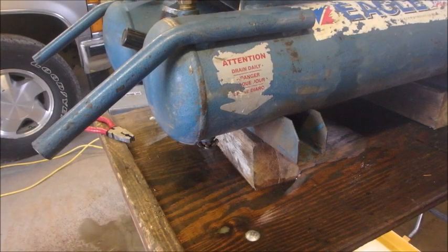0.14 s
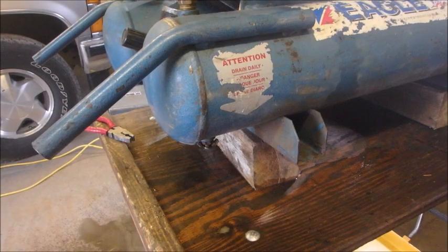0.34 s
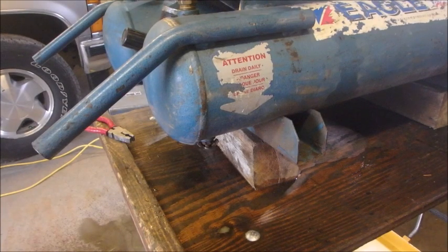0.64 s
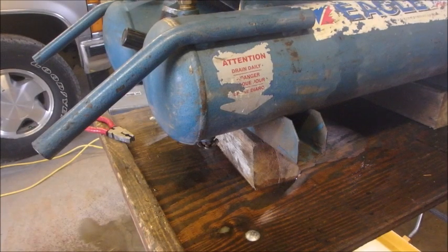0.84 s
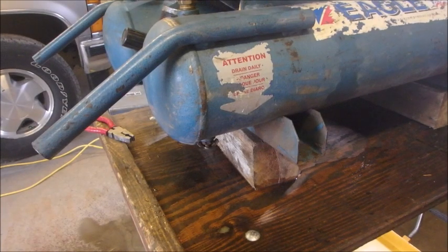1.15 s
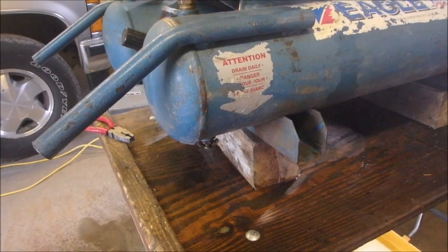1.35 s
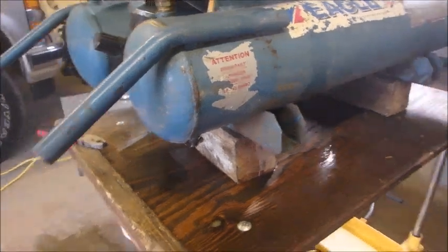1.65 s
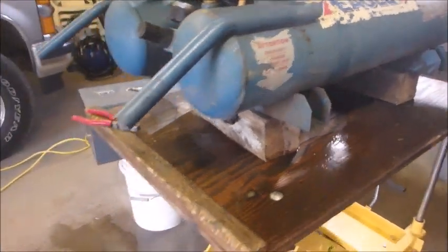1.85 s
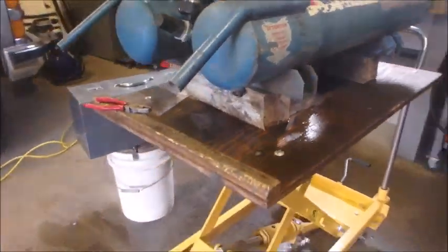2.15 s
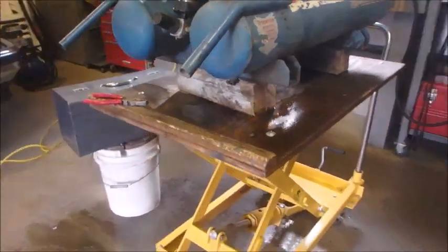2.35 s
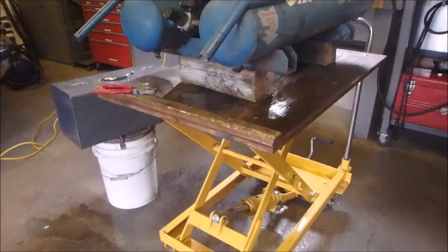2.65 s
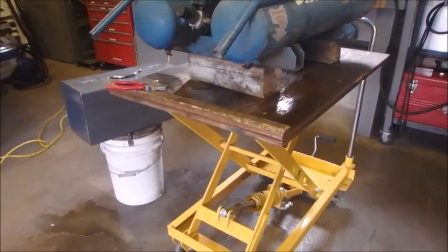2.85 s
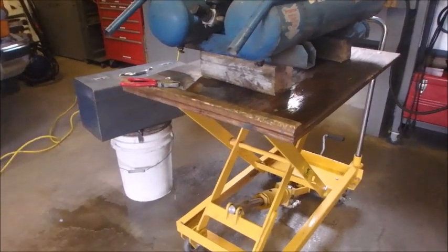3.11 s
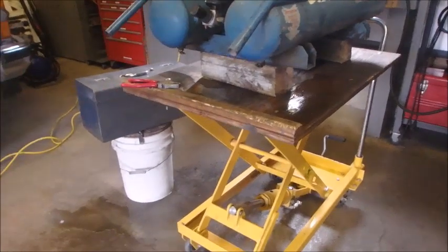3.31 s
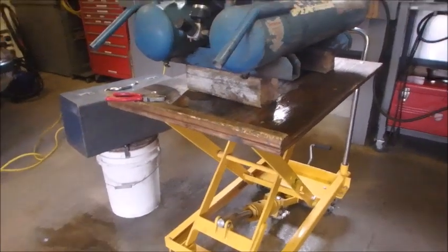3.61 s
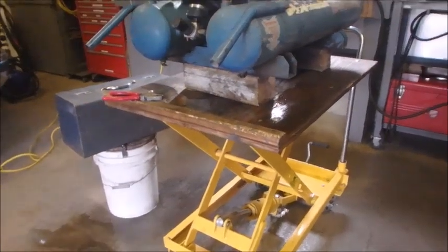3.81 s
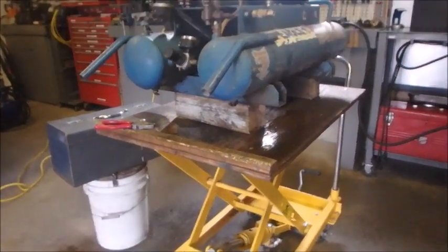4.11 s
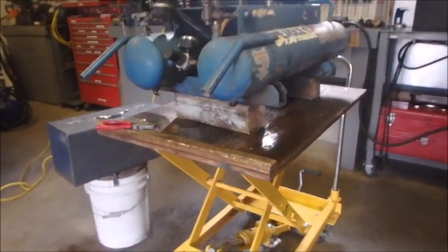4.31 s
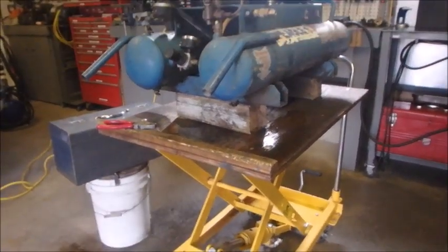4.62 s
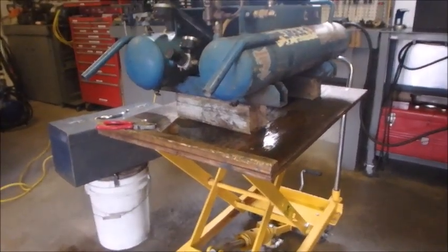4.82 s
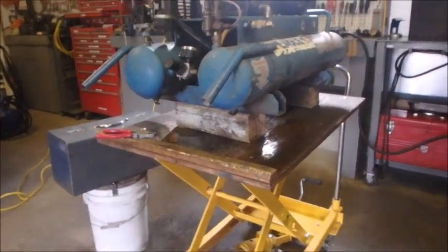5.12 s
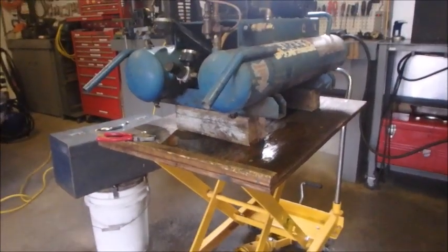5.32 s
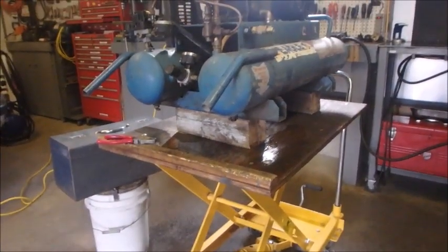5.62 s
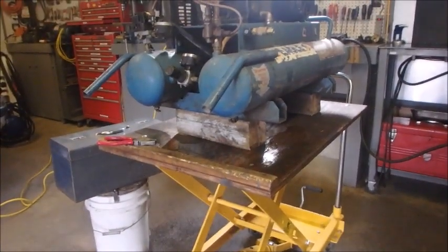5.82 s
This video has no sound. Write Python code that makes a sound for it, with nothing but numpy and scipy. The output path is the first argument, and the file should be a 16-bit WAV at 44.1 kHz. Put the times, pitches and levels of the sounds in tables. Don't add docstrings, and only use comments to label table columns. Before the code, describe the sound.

In a workshop, a dense, bright, slightly fluttering jet of air blows throughout in stereo. The microphone rests near the valve, then retreats across the floor, making muffled bumps and skin-rub rumble on its casing. A hard crack with a low wobble comes late and momentarily pushes the hiss down, followed by two firmer taps and small thumps.

```python
import sys
import numpy as np
from scipy import signal
from scipy.fft import rfft, irfft
from scipy.io import wavfile
from scipy.ndimage import uniform_filter1d

SR = 44100
rng = np.random.default_rng(int(sys.argv[2]) if len(sys.argv) > 2 else 0)


def to_linear_factor(level_db):
    exponent = np.asarray(level_db, float) / 20
    return 10 ** exponent


def dump_mix(stems):
    frames = np.atleast_2d(stems).T
    limited = np.clip(frames, -1, 1)
    pcm = np.round(limited * 32767).astype(np.int16)
    wavfile.write(sys.argv[1], SR, pcm)


N = 262832


def along(rows, at, warp=np.asarray):
    x, *columns = np.transpose(rows)
    return [np.interp(warp(at), warp(x), column) for column in columns]


def drift(rate, count=1):
    hop = 40
    r = np.exp(-2 * np.pi * hop * rate / SR)
    noise = rng.standard_normal((count, N // hop + 2002))
    slow = signal.lfilter([1], [1, -2 * r, r * r], noise)[:, 2000:]
    return np.array([np.interp(np.arange(N) / hop, np.arange(len(s)), s / s.std()) for s in slow])


def bumps(peaks, hz):
    return sum(db / (1 + (2 * (hz - centre) / width) ** 2) for centre, width, db in peaks)


def ring(click, hz, t60):
    r, w = to_linear_factor(-60 / (t60 * SR)), 2 * np.pi * hz / SR
    return signal.lfilter([0, np.sin(w)], [1, -2 * r * np.cos(w), r * r], click + 1e-18)


# time in seconds, jet level in dB, share of the way covered [0-1].
WALK = [
    (0, -23.5, 0.03),
    (1.45, -24, 0.05),
    (1.7, -22.5, 0.13),
    (1.82, -25, 0.18),
    (2.05, -25, 0.41),
    (2.5, -26, 0.82),
    (3, -24.5, 0.96),
    (3.9, -23.5, 0.91),
    (5, -24, 0.93),
    (5.96, -23, 0.95),
]


def jet():
    flutter_db = .35 * drift(12)[0] + .45 * drift(40)[0]
    sputter = to_linear_factor(flutter_db - uniform_filter1d(flutter_db, size=SR // 5))
    noise = rng.standard_normal((3, N)) * sputter
    hz, s, (common, *own) = signal.stft(noise, SR, nperseg=2048)
    level_db, way = along(WALK, s)
    way = np.clip(way, 0, 1)
    far = np.sin(np.pi / 2 * np.minimum(way / 0.95, 1)) ** 2
    gain = jet_colour(hz, s, way, far, level_db)
    f = hz[:, None]
    balance_db, lead, alike = ports(f)
    alike = 1 - (1 - alike) * np.where(f < 3000, 1 - .98 * far ** 4, .75)
    out = []
    for sign, own_noise in zip((1, -1), own):
        port = to_linear_factor(sign * balance_db / 2) * np.exp(-.5j * sign * lead)
        mixed = np.sqrt(alike) * common + np.sqrt(1 - alike) * own_noise
        out.append(gain * port * mixed)
    return signal.istft(np.array(out), SR, nperseg=2048)[1][:, :N]


# pitch in Hz, strength in dB per Hz.
NEAR = [(75, -37), (150, -29), (400, -22), (850, -12.5), (1550, -14), (2050, -10.5), (2350, -1),
        (3350, -6.5), (3900, -4.5), (6200, -7), (8800, -7), (11300, -8.5), (12700, -15), (14700, -23)]
FAR = [(30, -23), (150, -34), (400, -20.5), (850, -18), (1300, -13), (2050, -12), (2350, -4), (3300, -3),
       (3900, -6), (5800, -10), (6300, -9), (10500, -6.5), (13000, -20), (15100, -31.5)]
# pitch in Hz, width in Hz, boost in dB.
NEAR_CAVITIES = [(890, 450, 3.5), (2620, 270, -2.5), (3390, 410, 8), (4420, 690, 4.5), (5830, 520, 6.5),
                 (7200, 390, 4), (9400, 110, 0), (9940, 430, 1), (11060, 510, 5)]
FAR_CAVITIES = [(860, 220, 9.5), (2880, 150, -1), (3323, 145, 5), (3720, 31, 2.5), (4130, 58, 8.5),
                (5860, 230, 7), (7770, 700, -6), (8700, 290, 3.5), (8760, 100, 0.5), (12050, 780, 4),
                (14300, 1700, 11)]
# pitch in Hz, width in Hz, boost in dB.
SWING = [(915, 320, 0.5), (3490, 230, -4), (4130, 490, -5.5), (5600, 790, 3.5), (6600, 930, -2)]
# pitch in Hz, width in Hz, boost in dB.
STILL = [(8900, 120, 6), (10400, 780, 3), (13700, 600, 2), (14800, 100, 10)]


def jet_colour(hz, s, way, far, level_db):
    f, frames = hz[:, None], np.minimum((s * SR).astype(int), N - 1)
    near_gain = to_linear_factor(along(NEAR, hz + 1, np.log)[0] + bumps(NEAR_CAVITIES, hz))
    far_gain = to_linear_factor(along(FAR, hz + 1, np.log)[0] + bumps(FAR_CAVITIES, hz))
    gain = near_gain[:, None] ** (1 - far) * far_gain[:, None] ** far

    fade, midway = 1 - way ** 7.6, np.sin(np.pi * np.sqrt(way))
    hump = 9140 + (11460 - 9140) * way, 1100, 4.5 * fade + 2 * midway
    dip = 6300 + (10200 - 6300) * way, 1500, -4.5 * fade - 3.5 * midway
    passing = 4.0 * far * (1 - far)
    gain = gain * to_linear_factor(bumps([hump, dip], f) + passing * bumps(SWING, f))

    still_from_s, still_by_s = 4.1, 5.13
    still = np.clip((s - still_from_s) / (still_by_s - still_from_s), 0, 1)
    gain = gain * to_linear_factor(still * bumps(STILL, f))
    place = .6 * way + .25 * still + .15 * s / s[-1]
    gain = gain * to_linear_factor(walls(place, t60=.2, wet_db=-4.5, count=7))

    top_near_hz, top_far_hz = 14750, 15140
    edge_hz = top_near_hz + (top_far_hz - top_near_hz) * np.clip(12 * far - 3, 0, 1)
    edge_hz = edge_hz + 190 * (1 - .75 * far) * drift(9)[0, frames]
    gain = gain / (1 + np.exp((f - edge_hz) / 25))

    gain = gain * to_linear_factor(level_db) / np.sqrt(np.mean(gain ** 2, axis=0))
    patches = drift(11.5, count=16)[:, frames]
    band = np.clip(3 * np.log2(hz / 400 + 1), 0, 15).astype(int)
    return gain * to_linear_factor(0.29 * patches[band])


def walls(place, t60, wet_db, count):
    lag = np.arange(2048) / SR
    echoes = rng.standard_normal((count, len(lag))) * to_linear_factor(-60 * lag / t60)
    echoes = echoes / np.sqrt(np.sum(echoes ** 2, axis=1, keepdims=True))
    ripple = np.abs(1 + to_linear_factor(wet_db) * rfft(echoes))
    ripple_db = 20 * np.log10(ripple / uniform_filter1d(ripple, size=9))
    spots = np.linspace(0, 1, count)
    return np.array([np.interp(place, spots, row) for row in ripple_db.T])


# pitch in Hz, left over right in dB, right lead in radians, likeness [0-1].
PORTS = [(500, 0, 0, .925), (1700, 0, 0, .986), (4700, 0, 0, .97), (5600, -5, .1, .83),
         (8400, -5, -.8, .82), (11000, -4.5, -1.4, .84), (13500, -.8, -1.2, .66), (14700, 0, 0, .97)]
# pitch in Hz, width in Hz, left over right in dB, lead in radians, likeness lost [0-1].
PORT_CAVITIES = [(3450, 220, 6.5, .1, .06), (3770, 200, -8.5, .9, .22), (5200, 300, -2.5, .55, .22),
                 (6450, 600, .5, .2, .18), (7750, 400, -1.5, .4, .3), (10150, 900, -.3, .1, .22)]


def ports(hz):
    centre, width, *gaps = np.transpose(PORT_CAVITIES)
    more_db, more_lead, lost = (bumps(zip(centre, width, gap), hz) for gap in gaps)
    balance_db, lead, alike = along(PORTS, hz)
    return balance_db + more_db, lead + more_lead, np.clip(alike - lost, 0, 1)


# pitch in Hz, left level in dB, right level in dB,
# time to fade by 60 dB in seconds, first push (1 out, -1 in), delay in seconds.
KNOCK = [(1500, -4, -4, .003, 1, .0001), (2300, -9, -8, .005, -1, .0004), (560, -5, -6, .006, -1, .0004),
         (138, -17, -9, .09, 1, .0011), (270, -12, -18, .025, 1, .0012), (200, -13, -19, .04, 1, .002),
         (550, -18, -18, .04, -1, .002), (85, -20, -13, .16, -1, .003), (900, -26, -26, .02, 1, .001),
         (2420, -24, -11, .025, 1, .001), (3300, -16, -24, .025, 1, .001)]


def knock():
    start_s = 3.9779
    out = np.zeros((2, N))
    for hz, left_db, right_db, t60, polarity, delay in KNOCK:
        click = np.zeros(N)
        click[round((start_s + delay) * SR)] = np.sign(polarity)
        out += to_linear_factor([[left_db], [right_db]]) * ring(click, hz, t60)
    return out


# time in seconds, peak in dB, ring pitch in Hz, ring length in cycles.
THUMPS = [(1.575, -37, 190, 14), (1.633, -33, 111, 7.7), (1.696, -24.5, 118, 13), (1.726, -20, 147, 11),
          (1.744, -18, 199, 12), (1.776, -20.5, 150, 9.5), (1.823, -36, 140, 12), (2.145, -33.5, 157, 37),
          (2.177, -32.5, 152, 19), (2.431, -29, 104, 15), (2.462, -28, 80.6, 6.5), (2.589, -34, 100, 16),
          (2.62, -31.5, 158, 16), (3.274, -35, 70, 4.9), (3.349, -21, 154, 11.5), (3.711, -27.5, 189, 7.3),
          (3.766, -31, 148, 8), (4.061, -18.5, 75, 7), (4.131, -14.5, 146, 16), (4.231, -30, 656, 21),
          (4.881, -41, 93, 8), (4.886, -34, 240, 9), (5.092, -24, 144, 8.4), (5.222, -38, 165, 12),
          (5.34, -37, 110, 6.7), (5.502, -29, 94, 11)]
# time in seconds, peak in dB, sharpness in dB.
TAPS = [
    (5.0025, -12.5, 3.6),
    (5.4658, -15, -15.5),
]
# delay in seconds, level in dB, pitch in Hz, length in cycles,
# share of the tap's sharpness it takes.
TAP = [
    (0, -5.5, 304, 5.7, 1),
    (.003, -1.5, 123, 6.2, 0.1),
    (.003, -13.5, 720, 20, -0.021),
    (0.012, -8, 76, 10, 1),
    (0.019, -12, 151, 23, 0.3),
]


def thumps():
    hits = list(THUMPS)
    for s, db, sharp_db in TAPS:
        for delay, part_db, hz, cycles, share in TAP:
            hits.append((s + delay, db + part_db + share * sharp_db, hz, cycles))
    out = np.zeros((2, N))
    for s, db, hz, cycles in hits:
        at, click, t60 = round(s * SR), np.zeros(SR // 2), cycles / hz
        click[0] = -to_linear_factor(db)
        push = signal.sosfilt(signal.butter(2, 2.1 * hz, fs=SR, output="sos"), click)
        pan_db = -0.5 + 1.5 * np.log2(hz / 150)
        for port, sign in enumerate((1, -1)):
            body = ring(push, hz * (1 + sign * 0.0077), t60)
            body = body + 0.24 * ring(push, 1.41 * hz, 0.51 * t60)
            out[port, at:at + len(click)] += to_linear_factor(sign * pan_db / 2) * body[:N - at]
    return out


# pitch in Hz, width in Hz, strength in dB.
CASING = [(35, 19, 6.5), (75, 57, 3.5), (157, 70, 2.5), (250, 160, -24)]
# start in seconds, end in seconds, level in dB, rise in dB per second.
MOVES = [
    (1.42, 1.5, -75, 197),
    (1.72, 2.44, -46, 59),
    (2.594, 3.094, -51.5, 42),
    (3.348, 3.92, -52, 18),
    (4.02, 4.034, -38.5, 130),
    (4.87, 5.467, -53.5, 130),
]


def grip():
    hz, pair = np.fft.rfftfreq(N, 1 / SR), 0
    for centre, width, db in CASING:
        lumps = to_linear_factor(2.5 * drift(22)[0] + 1.2 * drift(6)[0])
        common, own = rng.standard_normal((2, N)) * lumps
        shape = to_linear_factor(db) / (1 + (2 * (hz - centre) / width) ** 2) * (hz > 12)
        sides = [0.8 * common + 0.26 * own, common - 0.12 * own]
        pair = pair + irfft(rfft(sides) * shape, N)
    s = np.arange(N) / SR
    levels = []
    for start, end, db, rise in MOVES:
        swell_db = rise * np.maximum(start - s, 0)
        settle_db = 47 * np.maximum(s - end, 0)
        levels.append(to_linear_factor(db + 5.0 - swell_db - settle_db))
    return np.max(levels, axis=0) * pair / np.std(pair.mean(axis=0))


def scene():
    handling = grip() + thumps()
    leak = signal.butter(1, 70, "high", fs=SR)
    handling[0] = signal.lfilter(*leak, handling[0])
    return jet() + handling + knock()


def roll_off(x):
    return signal.sosfilt(signal.butter(12, 15720, fs=SR, output="sos"), x)


# pitch in Hz, width in Hz.
NOTCHES = [(2200, 320), (3101, 150), (4102, 150), (5103, 150), (6105, 200)]


def record(dry):
    x = dry
    for hz, width in NOTCHES:
        for shift in (-.07, .07):
            notch = signal.iirnotch(hz + shift * width, hz / (.55 * width), SR)
            x = signal.lfilter(*notch, x)
    limit_db, slope, attack_s, release_db_s = -10, 1.566, 0.0069, 10.5
    peak_db = 20 * np.log10(np.abs(x).max(axis=0) + 1e-9)
    over_db = slope * np.maximum(peak_db - limit_db, 0)
    ramp = release_db_s * np.arange(N) / SR
    held_db = np.maximum.accumulate(over_db + ramp) - ramp
    r = np.exp(-1 / (attack_s * SR))
    duck_db = signal.lfilter([1 - r], [1, -r], np.maximum(held_db, 0))
    return roll_off(x * to_linear_factor(-duck_db))


dry = scene()
out = record(dry)
dump_mix(out)
```